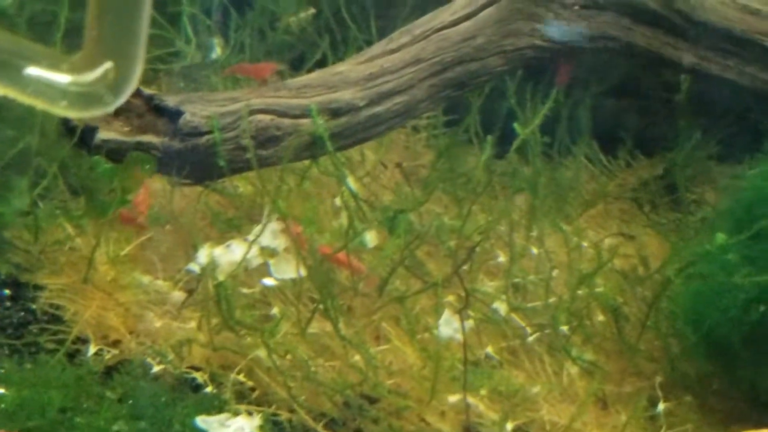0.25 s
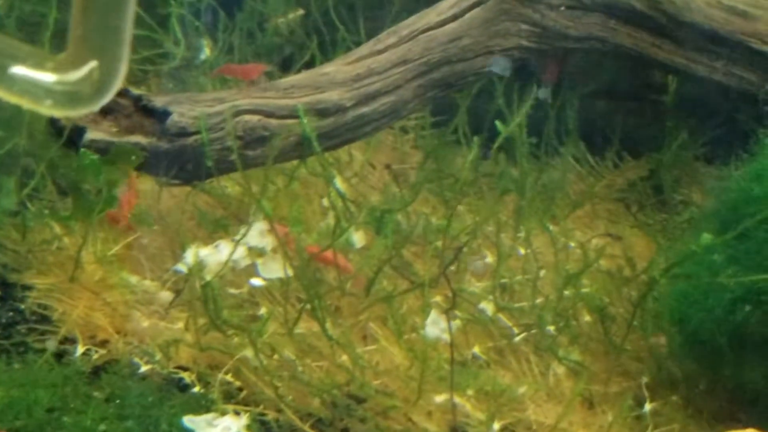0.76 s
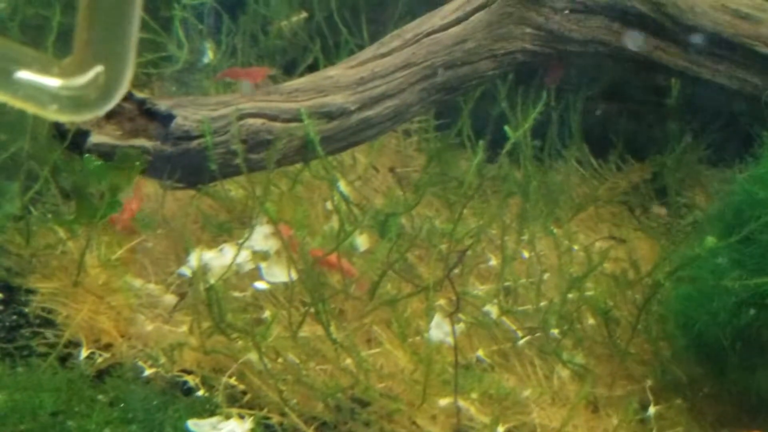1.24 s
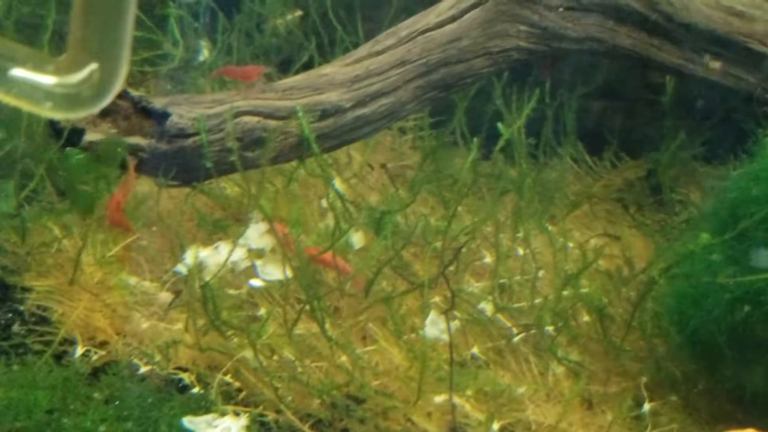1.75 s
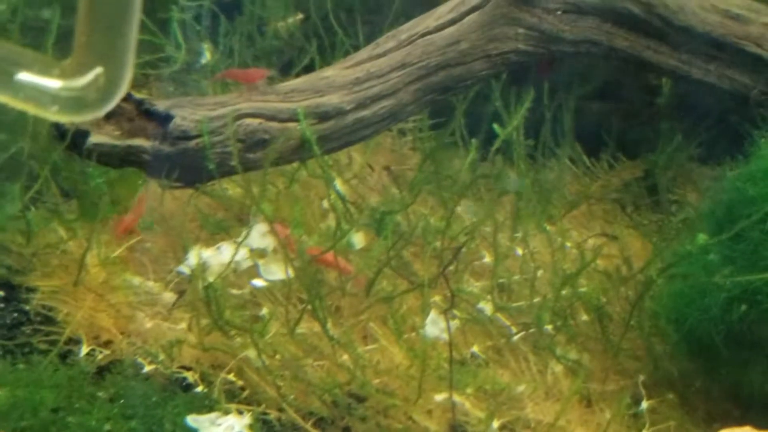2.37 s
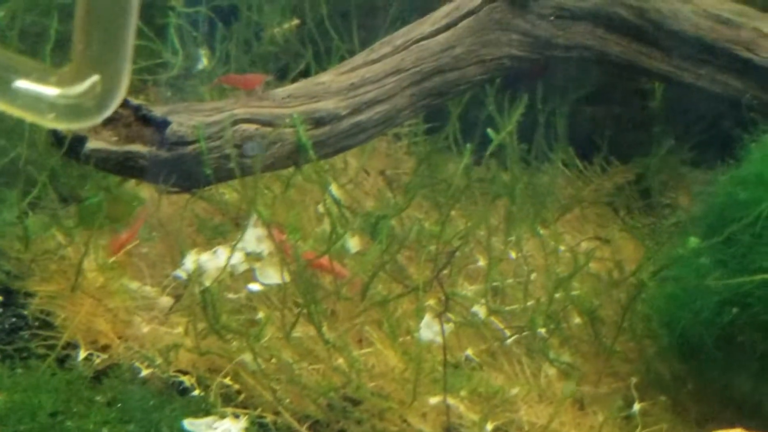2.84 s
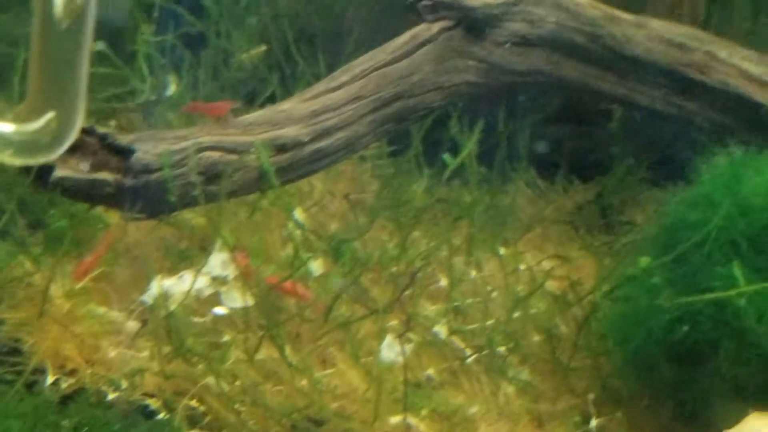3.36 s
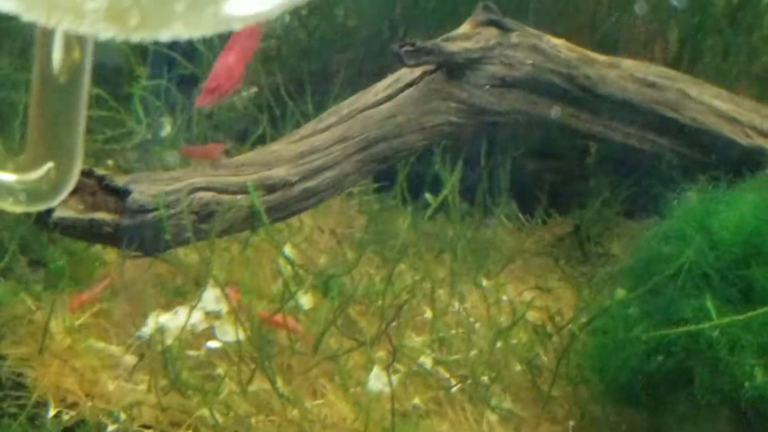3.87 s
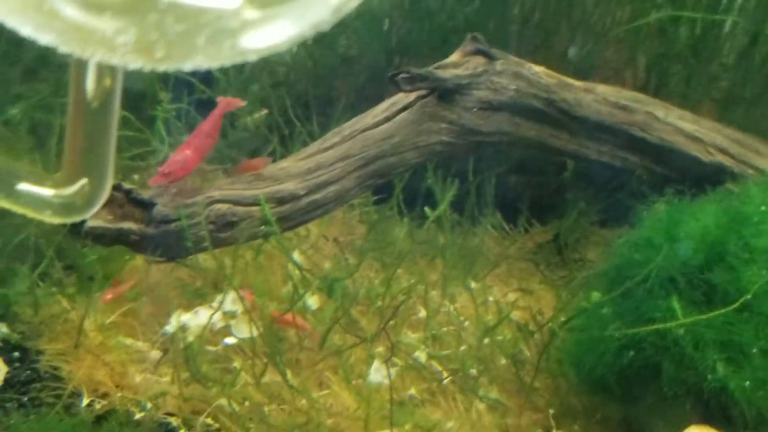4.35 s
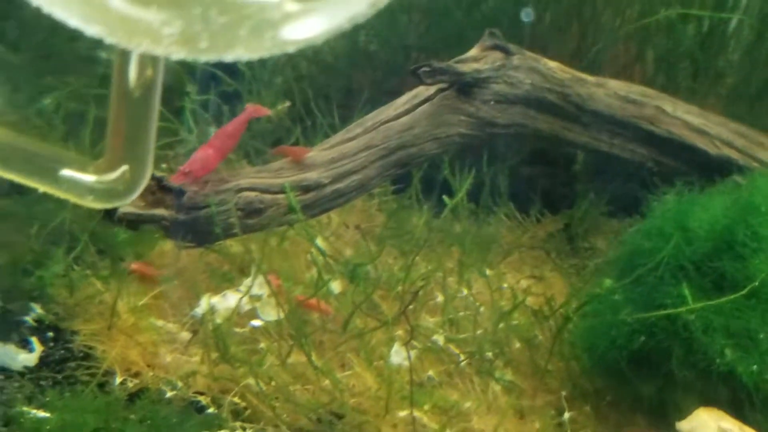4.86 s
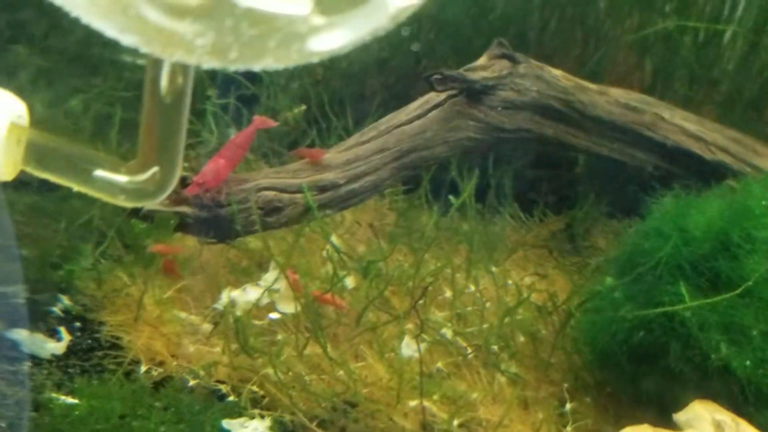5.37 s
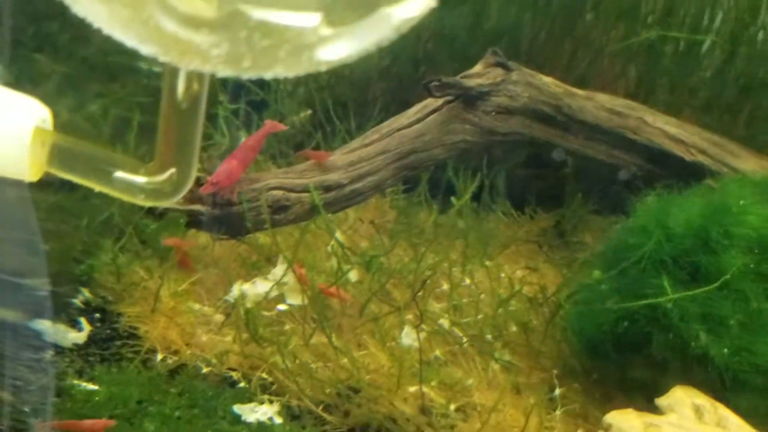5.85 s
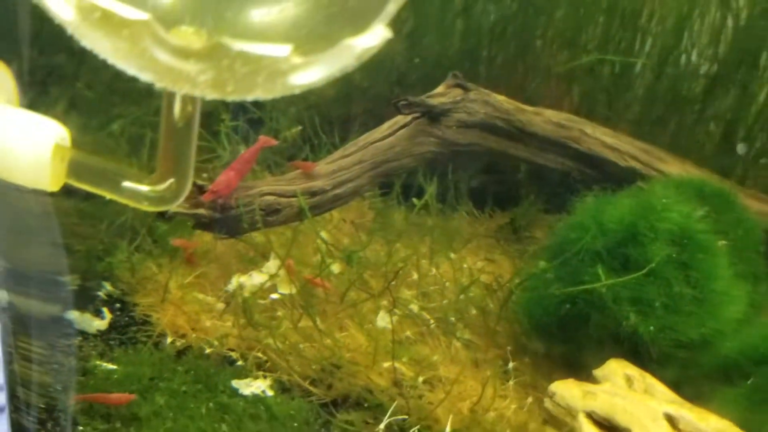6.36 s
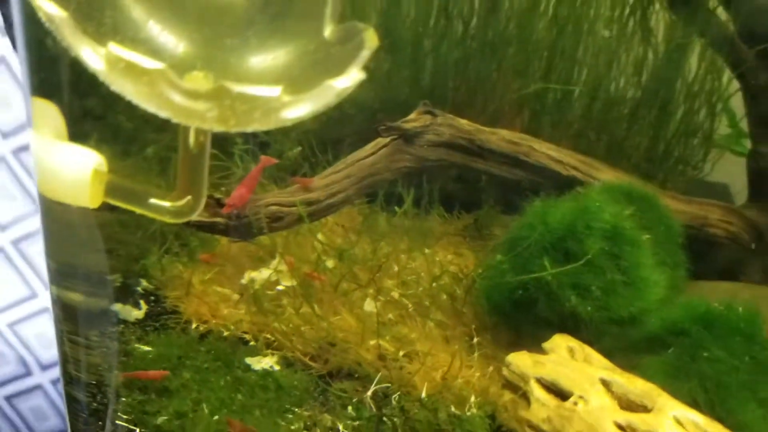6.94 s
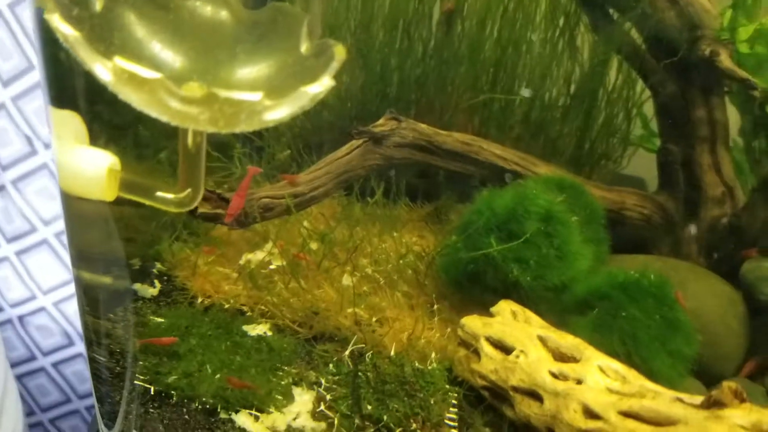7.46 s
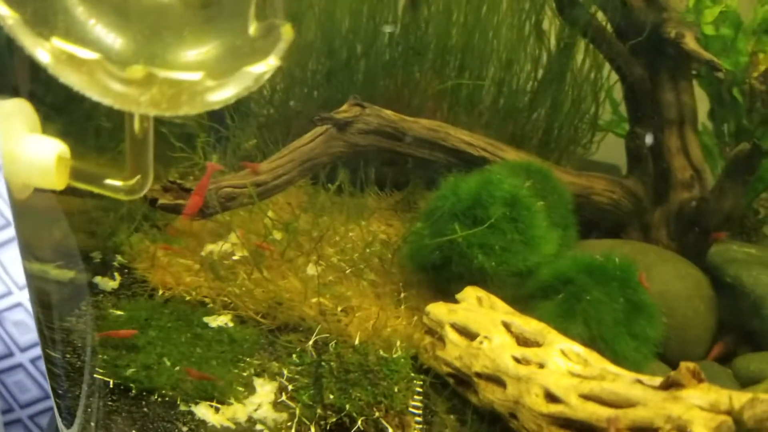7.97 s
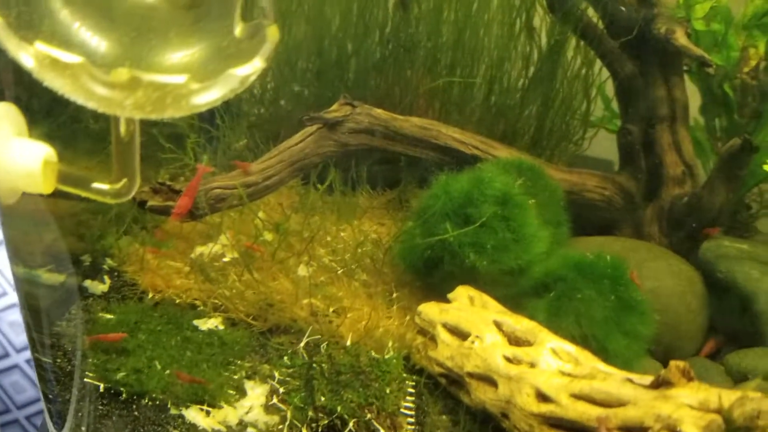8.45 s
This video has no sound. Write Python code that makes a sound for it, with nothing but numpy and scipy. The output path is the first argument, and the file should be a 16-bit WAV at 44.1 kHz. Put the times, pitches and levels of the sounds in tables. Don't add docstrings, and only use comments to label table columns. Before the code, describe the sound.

Steady low hum of a tank filter, barely wavering, with a fine rattling buzz and airy water hiss on top. Faint high fizz flickers throughout; little crisp bubble ticks arrive mid-way, then soft fizzing swells, and near the end one tiny round gulp. Close stereo pickup in a quiet room, the hiss changing slightly as the microphone draws back and turns.

```python
import sys
import numpy as np
from scipy import signal
from scipy.fft import rfft, irfft, next_fast_len
from scipy.io import wavfile
from scipy.ndimage import uniform_filter1d, map_coordinates

SR = 44100
rng = np.random.default_rng(int(sys.argv[2]) if len(sys.argv) > 2 else 0)


def waveform_to_disk(signal):
    frames = np.transpose(np.atleast_2d(signal))
    scaled = np.clip(frames, -1, 1) * 32767
    samples = np.round(scaled).astype(np.int16)
    wavfile.write(sys.argv[1], SR, samples)


def undo_db(level):
    steps = np.asarray(level, float) / 20
    return 10 ** steps


N = 384111

# multiple of the mains rate, right level in dB rms, left level in dB rms.
COIL_OVERTONES = [(1, -50, -52), (2, -50.3, -51.3), (3, -66, -68.5), (4, -62, -62), (5, -63, -68),
                  (6, -61, -61.3), (7, -87, -75), (8, -87, -81), (9, -81, -87), (10, -78, -91),
                  (12, -81.5, -100), (13, -80.5, -95), (14, -85, -94), (15, -80, -89), (17, -91, -102),
                  (18, -86, -96), (20, -74, -84), (21, -88, -101), (22, -76, -92), (26, -91, -98),
                  (27, -89, -104), (28, -85, -97), (29, -87, -97), (30, -80, -90), (31, -94, -106)]
# pitch in Hz, right level in dB rms, left level in dB rms.
WHINE = [(51.8, -78, -75), (548.5, -103, -84.5), (715, -82.5, -98), (1840, -101, -106)]
# frequency in Hz, level in dB.
BUZZ = [(4500, -105), (5300, -93), (6600, -100), (7100, -105), (8600, -101), (10500, -104), (11500, -120)]
# multiple of the mains rate, right level in dB rms, left level in dB rms.
RATTLE = [(87, -85, -104), (88, -86, -101), (90, -84, -102), (93, -87, -101), (103, -85, -99),
          (117, -92, -106), (118, -87, -104), (119, -88, -104), (120, -92, -112), (122, -89, -105),
          (124, -92, -110), (126, -91, -106), (128, -92, -106), (129, -90, -105), (130, -93, -112),
          (131, -94, -112), (132, -92, -108), (133, -94, -107), (134, -89, -104), (135, -94, -114),
          (141, -93, -108), (142, -91, -104), (144, -96, -111), (145, -96, -111), (150, -99, -103),
          (151, -100, -99), (153, -97, -98), (154, -98, -96), (155, -98, -94), (156, -102, -94)]
# centre in Hz, width in Hz, dB per Hz facing, dB per Hz turned away.
HOUSING = [(2556, 198, -90, -92.5), (2943, 154, -87, -85.5), (3166, 140, -85, -87), (3464, 107, -82.5, -82),
           (3622, 166, -85.5, -87.5), (3886, 124, -86.5, -89), (4062, 117, -85.5, -88)]
# frequency in Hz, dB per Hz facing, dB per Hz turned away.
FLOW = [(300, -120, -120), (600, -101, -100), (900, -96.5, -95.5), (1180, -94, -96), (1400, -100, -99),
        (1620, -99, -100.5), (1990, -104, -103), (2200, -100, -99), (2760, -94, -96), (4000, -95.5, -94.5),
        (4460, -110, -110), (5470, -130, -130)]
# frequency in Hz, dB per Hz near the glass, dB per Hz drawn back.
WATER_HISS = [(3040, -125, -125), (4220, -90.5, -94.5), (4350, -92.5, -93.5), (4940, -94, -93),
              (5060, -96.5, -97.5), (6120, -101, -99), (7130, -102, -102), (7500, -105, -106),
              (8100, -105, -103), (8420, -108, -107), (9140, -113, -110), (10500, -110, -116),
              (11600, -115, -110), (12300, -116, -112), (16000, -114, -113)]
# centre in Hz, width in Hz, level in dB near the glass, change in dB once
# drawn back, share of the common stir in dB.
FROTH = [(6250, 430, -76, 4.5, 1.2), (11300, 620, -80, -5, 1.8), (13700, 1900, -80.5, 3.5, 1),
         (15200, 1400, -79.5, -6, 1.2)]
# start in seconds, peak in dB, pitch in Hz, decay time in seconds (the tail takes
# 2.8 times this to fall by 60 dB).
POPS = [(2.0018, -58, 14600, 0.058), (2.136, -57, 13900, 0.12), (2.4254, -52, 13900, 0.04),
        (2.6803, -59, 14900, 0.071), (2.7347, -60, 15400, 0.1), (2.9911, -62, 15100, 0.11),
        (3.3124, -62, 15500, 0.15), (3.8122, -64, 13900, 0.14), (4.0996, -67, 13300, 0.077),
        (4.351, -64, 14500, 0.071), (4.5096, -51, 13700, 0.1), (4.6553, -65, 13800, .04),
        (5.0893, -64, 14000, 0.05), (5.3158, -61, 13300, 0.052), (7.7233, -64, 14200, 0.11)]
# start in seconds, peak in dB, pitch in Hz.
GULPS = [
    (7.527, -60, 1145),
]
# middle in seconds, peak in dB rms, centre in Hz, length in seconds.
CLOUDS = [
    (2.34, -76, 11300, .09),
    (4.74, -72, 11400, .06),
    (5.48, -72, 13700, .12),
    (5.65, -71, 12800, .12),
    (6.01, -73, 13300, .06),
    (6.16, -69, 13200, .14),
    (6.62, -72, 14400, .07),
    (6.82, -74, 12300, .14),
]
# middle in seconds, rise in dB.
PUFFS = [
    (.56, 6),
    (1.99, 4),
    (2.42, 3),
    (3.3, 5),
    (5.24, 4),
    (8.11, 5),
    (8.59, 3),
]
# frequency in Hz, dB per Hz.
RUMBLE = [(10, -110), (20, -86), (40, -95), (90, -86), (160, -90.5), (210, -86), (280, -89), (330, -91),
          (450, -96), (570, -106), (800, -125)]
# time in seconds, turn away from 0 to 1.
TURN = [
    (0, 0),
    (3.2, 0),
    (4.6, 0.32),
    (5.7, .45),
    (6.5, 0.8),
    (7.5, 1),
    (8.71, 1),
]
# frequency in Hz, gain in dB facing, gain in dB turned away.
SHADE = [(500, -9, -10), (740, -7, -15), (1240, -15.5, -16), (2010, -6, -11), (2500, -14.5, -15),
         (2900, -13.5, -21), (3520, -8.5, -12), (4010, -2, -4.5), (4170, -10.5, -11.5), (4600, -11, -16),
         (5070, -13.5, -29), (7000, -17.5, -36), (8700, -14, -33), (11000, -10, -22)]
# frequency in Hz, left-right likeness from 0 to 1.
ALIKE = [(30, 0.52), (100, 0.7), (300, 0.82), (500, 0.4), (900, 0.91), (1500, 0.47), (3500, 0.64),
         (6000, 0.66), (12000, 0.78)]
# frequency in Hz, dB per Hz.
PREAMP = [(300, -116), (2000, -114), (5000, -118), (8000, -123), (10500, -117.5), (16000, -116.5)]

MAINS_HZ = 60.022
PULL_BACK_S, PULL_LASTS_S = 3.36, 0.06
RECEDE_DB = -0.7
HUM_SHADE_DB = -0.9
FLICKER_DB, DRIFT_DB = 1.3, 0.6
SEETHE_DB, SEETHE_GROWS_DB = -86, 8
SIZZLE_DB, PUFF_S = -80.5, 0.045
POP_PAN_DB = -7
CLOUD_WIDTH = 0.075


def along(points, hz, count=1):
    cols = np.transpose(points)
    return np.interp(np.log(hz + 1), np.log(cols[0] + 1), cols[count])


def curves(rows):
    s, *cols = np.transpose(rows)
    return [np.interp(np.arange(N) / SR, s, c) for c in cols]


def wobble(rate):
    coarse = np.arange(0, N + 64, 64)
    knots = rng.standard_normal(int(N * rate / SR) + 4)
    return np.interp(np.arange(N), coarse, map_coordinates(knots, [coarse * rate / SR]))


def filtered(x, response):
    m = next_fast_len(N + 8192)
    return irfft(rfft(x, m) * response(np.fft.rfftfreq(m, 1 / SR)), m)[..., :N]


def hump(hz, centre_hz, width_hz):
    return (1 + ((hz - centre_hz) / width_hz) ** 2) ** -2


def noise(gain):
    pair = rng.standard_normal((2, N)) * np.sqrt(SR / 2)

    def mid_and_side(hz):
        angle = np.arccos(np.clip(along(ALIKE, hz), 0, 1)) / 2
        return gain(hz) * [np.cos(angle), np.sin(angle)]
    mid, side = filtered(pair, mid_and_side)
    return np.array([mid + side, mid - side])


def band(centre_hz, width_hz):
    x = noise(lambda hz: 1 / (1 + ((hz - centre_hz) / (width_hz / 2)) ** 4))
    return x / x.std()


def bandpassed(x, order, edges):
    edges = np.clip(edges, 100, SR / 2 - 100)
    y = signal.sosfilt(signal.butter(order, edges, "bandpass", fs=SR, output="sos"), x)
    return y / y.std()


def patchy(x, depth_db):
    z = signal.stft(x, nperseg=512)[2]
    field = uniform_filter1d(rng.standard_normal(z.shape[1:]), size=5, axis=0)
    field = uniform_filter1d(field, size=18, axis=1)
    return signal.istft(z * undo_db(depth_db * field / field.std()), nperseg=512)[1][:, :N]


def mains_phase():
    return np.cumsum(MAINS_HZ + wobble(1) / 150) / SR - 4 / 25


def wall_phase(hz):
    null = np.arctan((hz - 181) / 8)
    resonance = np.arctan((hz - 351.4) / 4)
    return null - resonance + 2 * np.arctan(25 / hz) - 1.95


def coil(cycles, turn):
    out, shaded = np.zeros((2, N)), undo_db(-7 * turn)
    for multiple, right_db, left_db in COIL_OVERTONES:
        k = round(multiple)
        phase = wall_phase(k * MAINS_HZ) + rng.uniform(0, 2 * np.pi) * (k > 6)
        late = min(0.09 * k, 0.45) * (1 + 0.65 * turn)
        waver = undo_db(3 + min(0.13 * k, 1.8) * wobble(6))
        angle = 2 * np.pi * k * cycles + phase
        out[0] += undo_db(left_db) * waver * (shaded if k > 8 else 1) * np.cos(angle - late)
        out[1] += undo_db(right_db) * waver * np.cos(angle)
    for hz, right_db, left_db in WHINE:
        drift = np.cumsum(hz * (1 + 0.00206 * wobble(2))) / SR
        out += undo_db([[left_db], [right_db]]) * np.sqrt(2) * np.cos(2 * np.pi * drift)
    return out


def armature(cycles, size=8192):
    hz = np.arange(size // 2 + 1) * MAINS_HZ
    right_db = along(BUZZ, hz) + rng.normal(0, 4.8, len(hz))
    level_db = np.array([right_db - 20, right_db])
    for multiple, right, left in RATTLE:
        level_db[:, round(multiple)] = left, right
    lines = undo_db(level_db + 3) * np.exp(2j * np.pi * rng.random(len(hz))) * (hz < SR / 3)
    shapes = irfft(lines, size) * size / 2
    place = np.arange(size) / size
    rattle = np.array([np.interp(cycles % 1, place, s, period=1) for s in shapes])
    return undo_db(0.48 * wobble(3)) * rattle


def flow(turn, back):
    def body(hz, j):
        modes = sum((undo_db(row[j + 1]) * hump(hz, row[0], row[1])) ** 2 for row in HOUSING)
        return np.sqrt(modes + undo_db(along(FLOW, hz, count=j)) ** 2)

    def blended(density, share):
        white = noise(np.ones_like)
        before, after = (filtered(white, lambda hz: density(hz, j)) for j in (1, 2))
        return (1 - share) * before + share * after
    hiss = blended(lambda hz, j: undo_db(along(WATER_HISS, hz, count=j)), back)
    rush = patchy(blended(body, turn), depth_db=0.78)
    return rush + undo_db(0.2 * wobble(9)) * patchy(hiss, depth_db=1.3)


def surface(back, turn):
    stir = wobble(18)
    out = np.zeros((2, N))
    for hz, width_hz, db, change_db, stir_db in FROTH:
        level_db = db + change_db * back + stir_db * stir
        level_db = level_db + DRIFT_DB * wobble(2.5) + FLICKER_DB * wobble(25)
        out += undo_db(level_db) * band(hz, width_hz)
    seethe_db = SEETHE_DB + SEETHE_GROWS_DB * turn + 1.5 * stir
    return out + undo_db(seethe_db) * band(centre_hz=12300, width_hz=720)


def bubbles():
    out, t = np.zeros((2, N + SR)), np.arange(SR // 4) / SR
    for s, db, hz, t60 in POPS:
        burst = rng.standard_normal(len(t)) + 6 * (t == t[8])
        spit = bandpassed(burst, 4, [hz - 900, hz + 1300])
        shape = 0.75 * undo_db(-60 * t / 0.008) + 0.29 * undo_db(-60 * t / (2.8 * t60))
        out[:, round(s * SR):][:, :len(t)] += undo_db([[db - 4.0 + POP_PAN_DB], [db + 0.3]]) * spit * shape
    for s, db, hz in GULPS:
        life = 15 / hz
        swell = t / life * np.exp(1 - t / life)
        ring = swell * np.sin(2 * np.pi * hz * t * (1 + 0.0071 * t / life))
        out[:, round(s * SR):][:, :len(t)] += undo_db([[db - 12], [db]]) * ring
    return out[:, :N]


def clouds():
    out, t = np.zeros((2, N + SR)), np.arange(SR // 4) / SR
    for s, db, hz, length_s in CLOUDS:
        fizz = bandpassed(rng.standard_normal(len(t)), 2, hz * (1 + CLOUD_WIDTH * np.array([-1, 1])))
        swell = np.cos(np.pi * np.clip((t - 1 / 8) / length_s, -0.5, 0.5)) ** 2
        level = undo_db([[db + POP_PAN_DB - 5], [db]])
        out[:, round((s - 1 / 8) * SR):][:, :len(t)] += level * fizz * swell
    return out[:, :N]


def sizzle():
    t = np.arange(N) / SR
    puffs_db = sum(db * np.clip(1 - abs(t - s) / PUFF_S / 2, 0, 1) for s, db in PUFFS)
    level_db = SIZZLE_DB + puffs_db + 1.3 * wobble(15) + 0.8 * wobble(2)
    return undo_db(level_db) * band(centre_hz=9640, width_hz=1200)[0]


def rumble():
    return undo_db(0.9 * wobble(4)) * noise(lambda hz: undo_db(along(RUMBLE, hz)))


def shade(left, turn):
    facing, away = (filtered(left, lambda hz: undo_db(along(SHADE, hz, count=j))) for j in (1, 2))
    return (1 - turn) * facing + turn * away


def scene():
    t = np.arange(N) / SR
    turn = np.clip(curves(TURN)[0], 0, 1)
    back = (1 + np.tanh((t - PULL_BACK_S) / PULL_LASTS_S)) / 2
    cycles = mains_phase()
    low = coil(cycles, turn) + armature(cycles) + rumble()
    low[0] *= undo_db(HUM_SHADE_DB * (turn - turn.mean()))
    left, right = flow(turn, back) + surface(back, turn)
    water = np.array([shade(left, turn) + sizzle(), right])
    recede = undo_db(RECEDE_DB * (t / t[-1] - 0.5))
    return recede * (low + water) + bubbles() + clouds()


def band_limit(x):
    return signal.sosfilt(signal.butter(12, 15960, fs=SR, output="sos"), x)


def record(dry):
    white = rng.standard_normal(dry.shape) * np.sqrt(SR / 2)
    hiss = filtered(white, lambda hz: undo_db(along(PREAMP, hz)))
    mix = filtered(dry + hiss, lambda hz: hz < 15770)
    return band_limit(mix)


dry = scene()
out = record(dry)
waveform_to_disk(out)
```